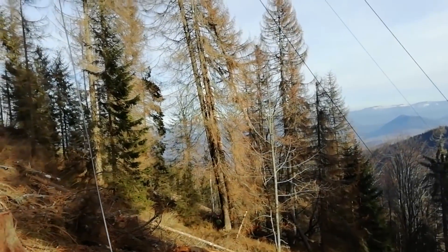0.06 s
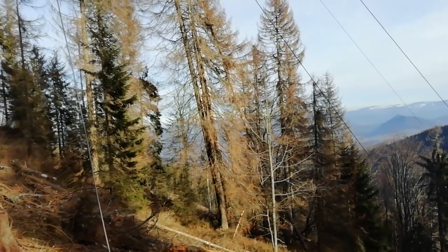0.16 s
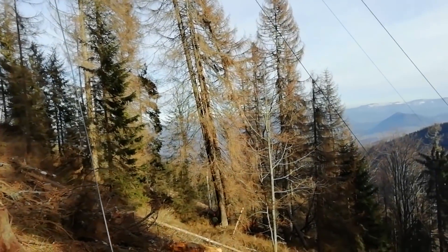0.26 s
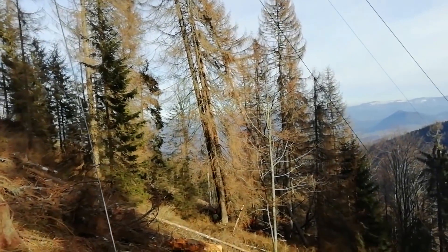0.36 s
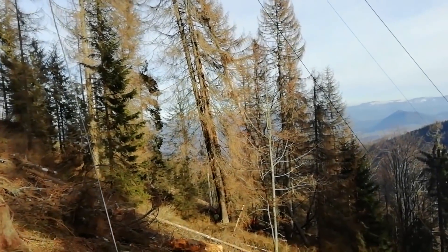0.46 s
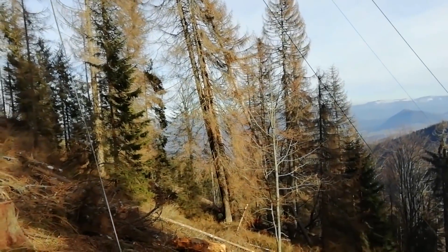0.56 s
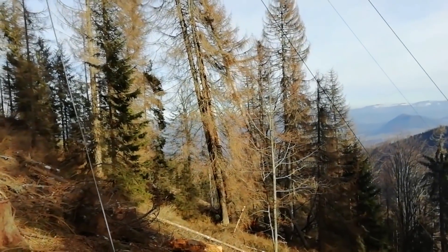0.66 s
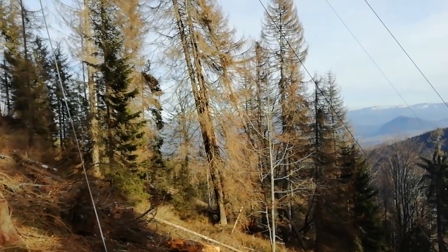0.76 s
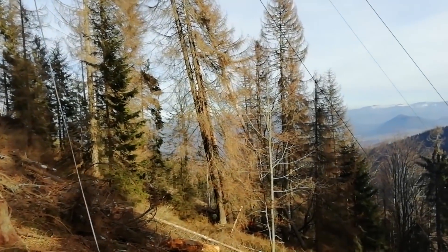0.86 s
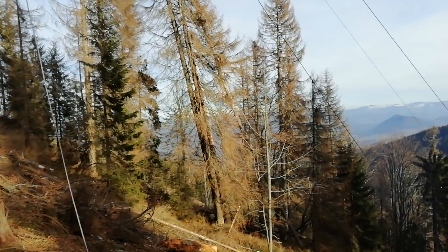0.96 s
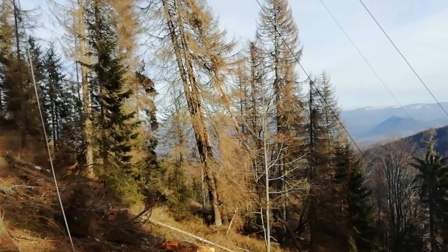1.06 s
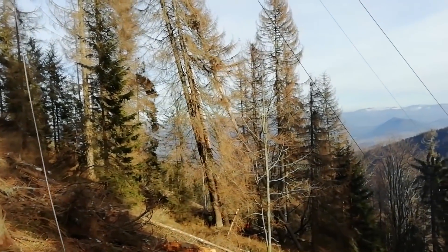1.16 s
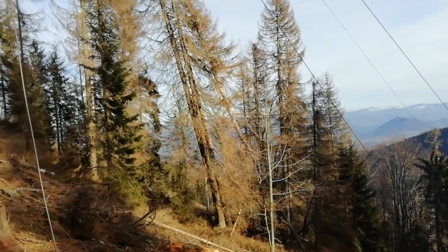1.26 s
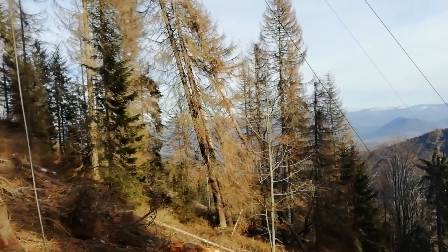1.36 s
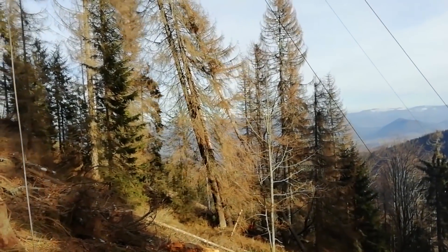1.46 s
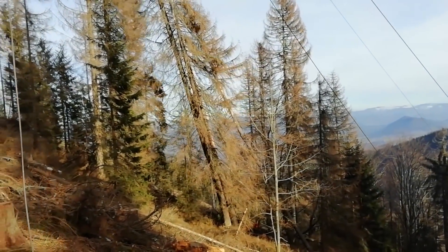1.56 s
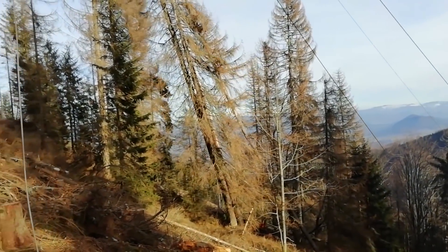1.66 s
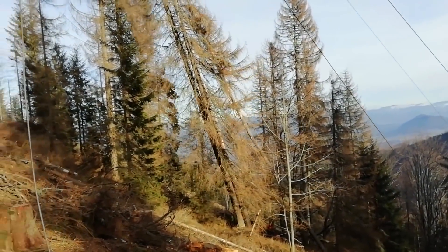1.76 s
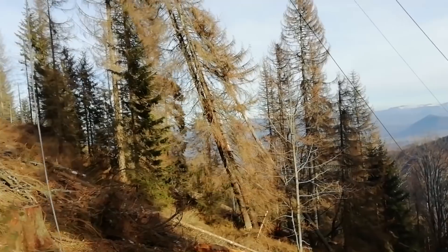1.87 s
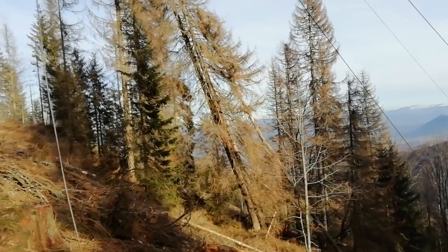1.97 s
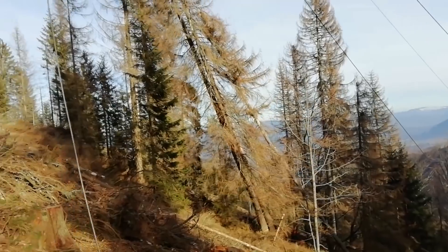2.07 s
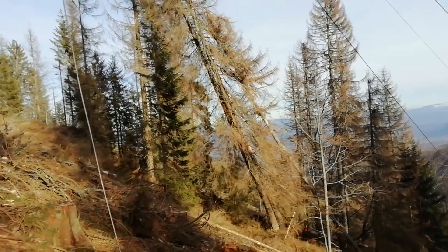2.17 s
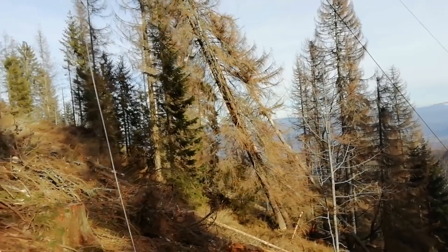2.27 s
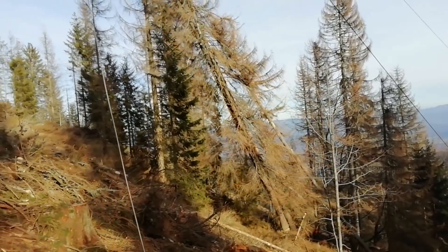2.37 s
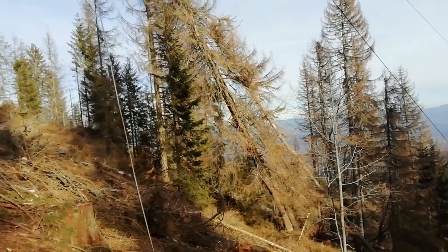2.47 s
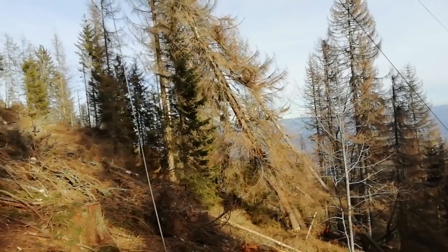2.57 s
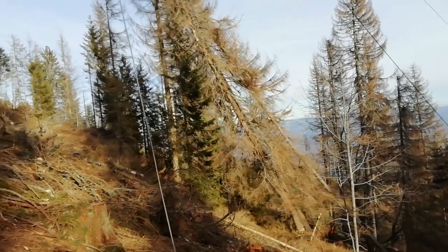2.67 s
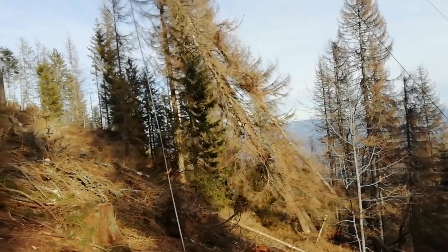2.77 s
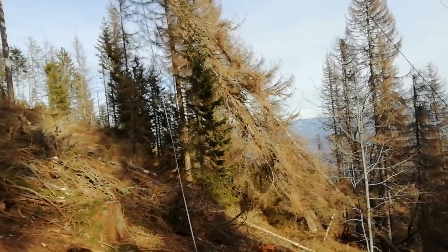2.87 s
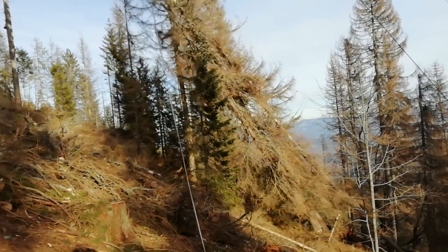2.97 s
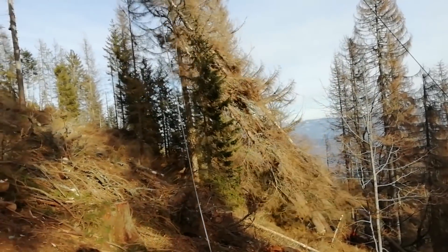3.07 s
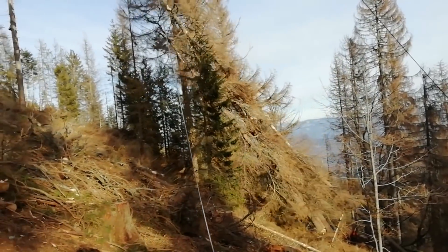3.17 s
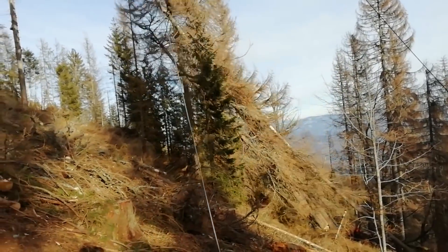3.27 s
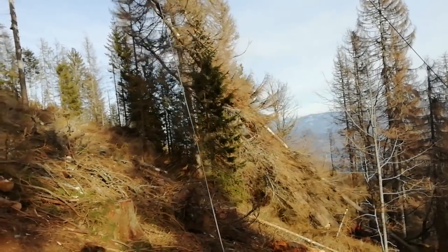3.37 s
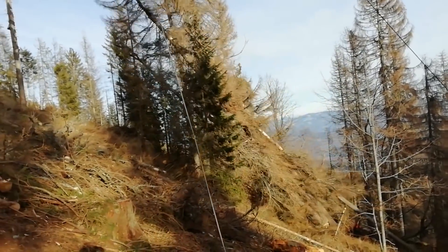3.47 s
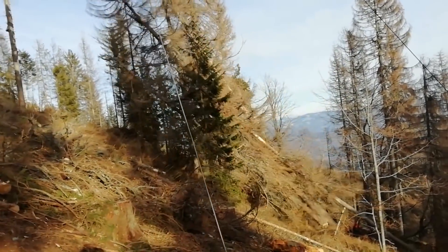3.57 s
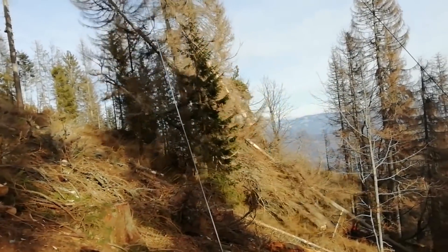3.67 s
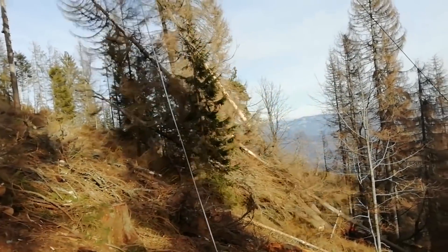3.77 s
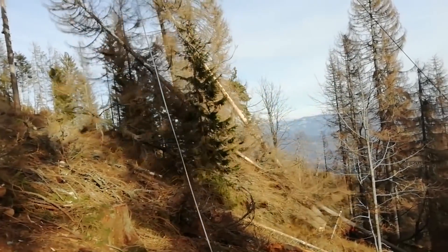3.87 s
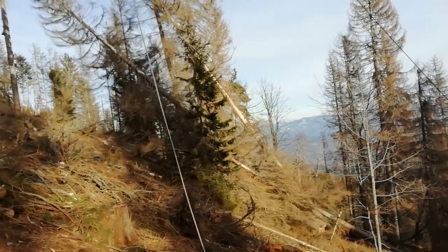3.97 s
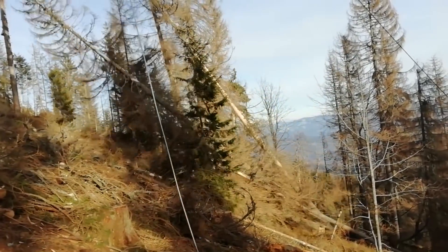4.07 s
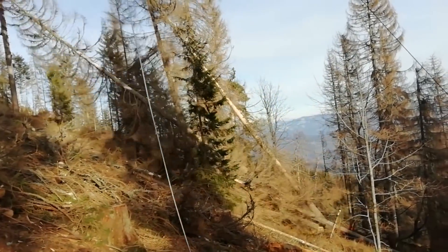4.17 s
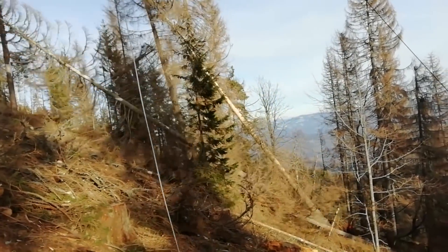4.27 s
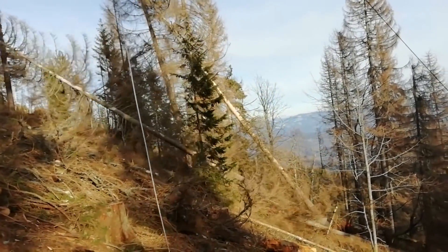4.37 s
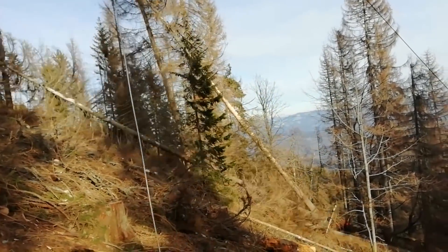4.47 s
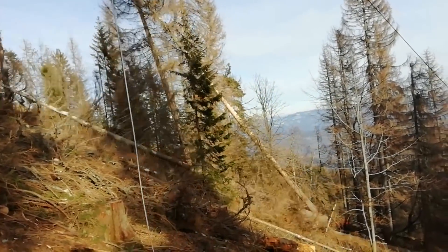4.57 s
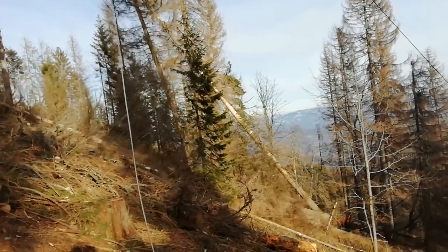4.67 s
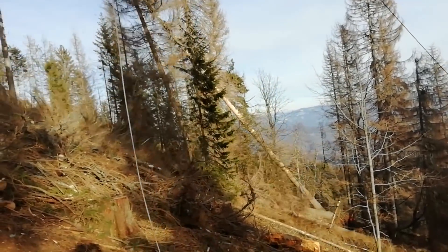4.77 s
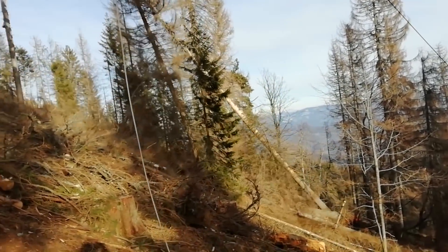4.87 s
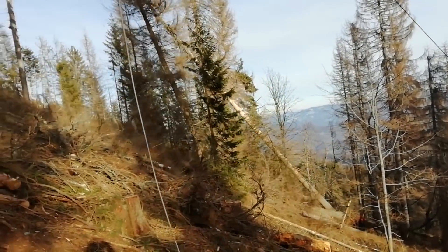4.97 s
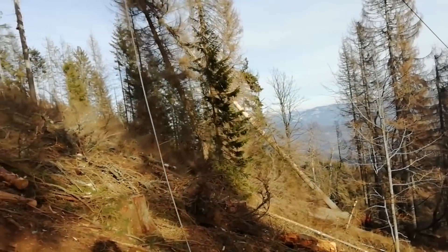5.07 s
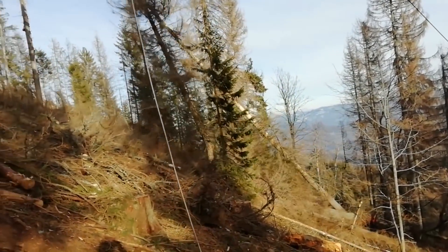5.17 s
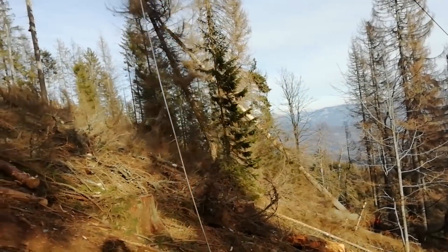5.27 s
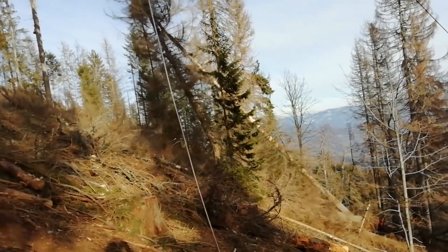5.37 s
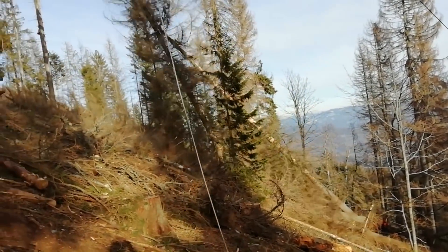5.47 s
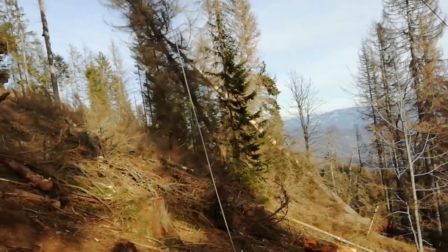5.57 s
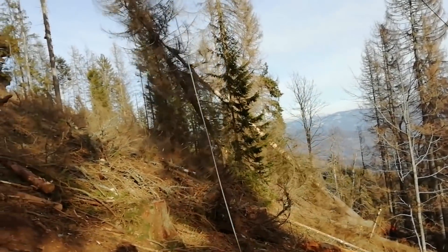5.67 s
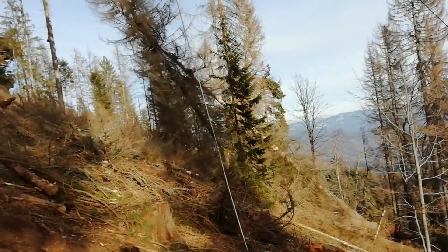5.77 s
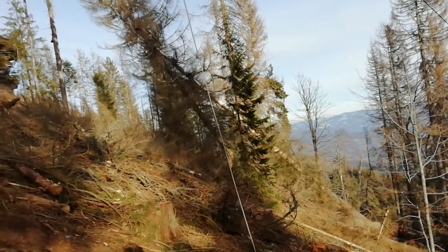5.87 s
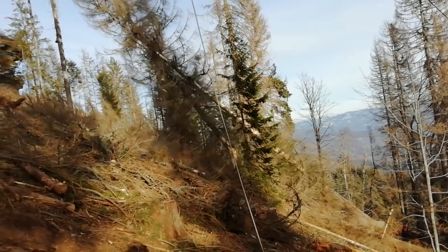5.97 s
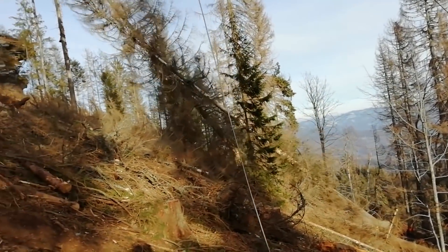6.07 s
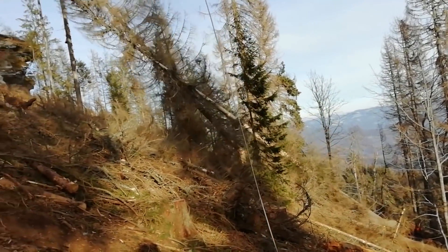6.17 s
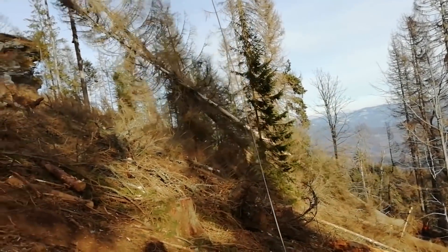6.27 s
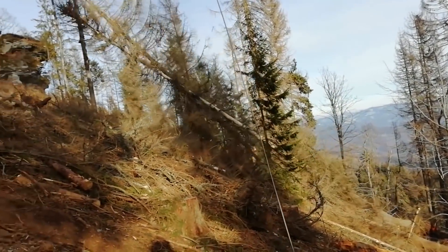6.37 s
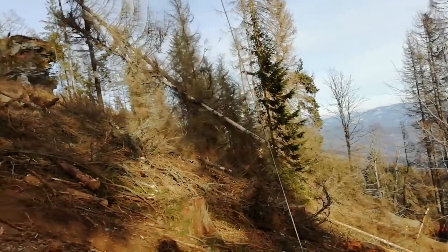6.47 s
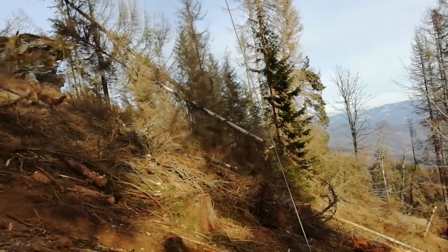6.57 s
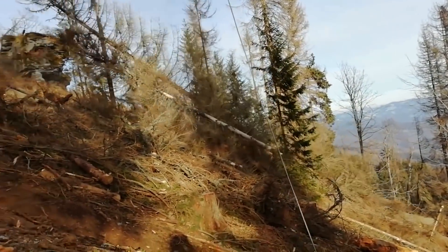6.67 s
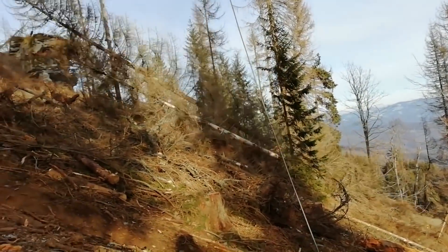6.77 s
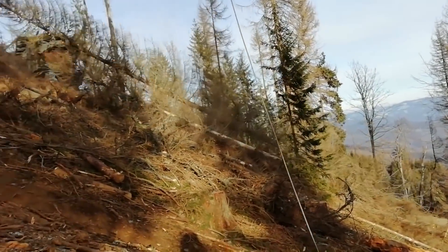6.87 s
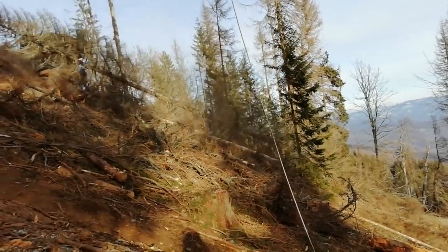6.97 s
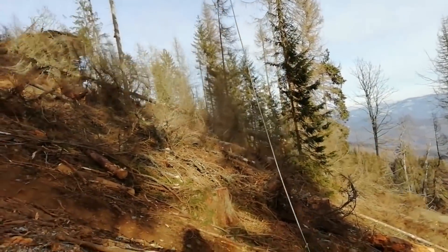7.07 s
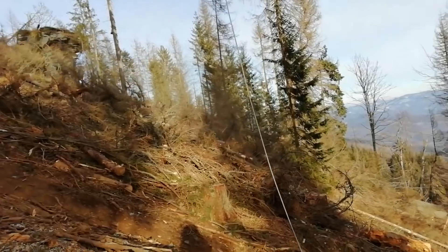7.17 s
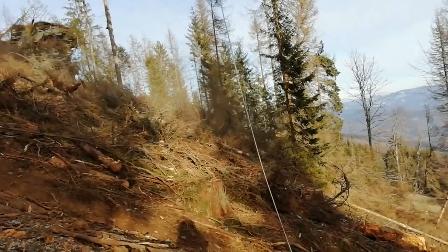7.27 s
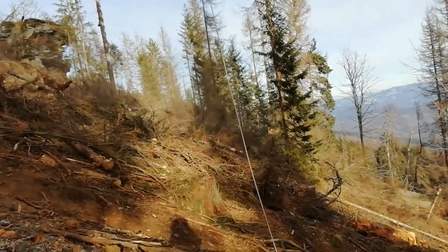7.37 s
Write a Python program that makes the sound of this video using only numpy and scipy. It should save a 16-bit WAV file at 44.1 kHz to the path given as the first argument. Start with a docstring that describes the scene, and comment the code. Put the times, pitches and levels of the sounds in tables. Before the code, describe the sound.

On a wooded slope, heard from some distance on a hand-held stereo microphone, a tree tears loose with a few hard cracks, quiets to sparse ticking twigs, then crashes through branches in dense snapping and crunching. Needles swish and low thuds rumble beneath. Scattered cracks follow as a second tree falls, with one dull jolt at the microphone and a final thick crackling burst.

```python
"""On a wooded slope, some way from a hand-held camera, felled trees tear loose and crash through their neighbours.
Limbs crack one by one as shaped noise bursts with a wood resonance; random pulses make the crackle of twigs
and steady noise the swish of needles. Decaying sparse echoes off the trunks give each crack a short tail.
Filtered noise and single low pulses rumble as light wind and ground thuds; one pressure step jolts the microphones."""
import sys
import numpy as np
from scipy import signal
from scipy.fft import rfft, irfft, next_fast_len
from scipy.io import wavfile
from scipy.ndimage import uniform_filter1d

SR = 44100
rng = np.random.default_rng(int(sys.argv[2]) if len(sys.argv) > 2 else 0)


def unload_audio(sound):
    """Save the sound as a 16-bit wav file, at the path given as the first command line argument."""
    columns = np.transpose(np.atleast_2d(sound))
    # keep every value between -1 and 1, then stretch to whole-number steps
    steps = np.round(np.clip(columns, -1, 1) * 32767)
    wavfile.write(sys.argv[1], SR, steps.astype(np.int16))


N = 327222

# limbs that break: peak t/s, body peak level/dB, wood pitch f/Hz, snap level/dB re body, brightness/dB,
# t60/s (before the factor of each register)
LIMBS = [(0.063, -19.5, 1980, 0.5, -5.5, 0.039), (0.088, -16, 2090, -1, -13.5, 0.079),
         (0.101, -18.5, 1120, 0.5, -20, 0.034), (0.1271, -17.5, 2040, 5, -5.5, 0.046),
         (0.221, -12, 1280, -6.5, -14, 0.021), (0.332, -16.5, 794, -0.5, -14, 0.029),
         (0.358, -19, 1540, 1, -16, 0.027), (0.384, -8, 1490, -9, -19, 0.025),
         (0.699, -18, 1000, -15, -40, 0.03), (0.806, -11, 1430, -5.5, -11.5, 0.023),
         (0.846, -29, 1880, -2, -3, 0.077), (0.897, -30, 1810, -1, -6.5, 0.17),
         (1.017, -34, 1140, 2, -3, 0.033), (1.027, -26.5, 1140, -0.5, -6, 0.21),
         (1.367, -22, 1480, -3.5, -6.5, 0.035), (1.454, -36.5, 1510, 4, 4, 0.22),
         (1.546, -24, 1380, 4, -4.5, 0.034), (1.602, -13, 2100, 1, -15, 0.022),
         (1.62, -37.5, 1510, -15, 11, 0.016), (1.678, -25, 1140, 0.5, -9.5, 0.2),
         (1.885, -44.5, 1490, 8, 8, 0.01), (1.92, -32, 1290, 4.5, -1.5, 0.04),
         (1.981, -33, 1550, 7, -6, 0.023), (2.045, -32.5, 1190, 4, -18, 0.061),
         (2.174, -31, 1810, 7, 4.5, 0.018), (2.264, -40, 1170, -11, 8.5, 0.039),
         (2.331, -40, 1370, 4, 11.5, 0.029), (2.404, -33, 1290, 11, 2.5, 0.052),
         (2.476, -27.5, 1510, 0, 0, 0.52), (2.57, -26, 1570, 2, 2.5, 0.01),
         (2.736, -14.5, 1510, 2.5, -7, 0.041), (2.894, -44, 1490, -15, 10, 0.085),
         (2.918, -18, 840, 2.5, -2, 0.032), (2.97, -10.5, 1390, -10, -8.5, 0.043),
         (3.007, -17, 1360, 1, -9, 0.13), (3.086, -17.5, 921, 8.5, -5, 0.016),
         (3.098, -12, 1230, -17, -11, 0.065), (3.216, -7.5, 1090, -43, -22, 0.012),
         (3.239, -18.5, 1340, 3, -6.5, 0.046), (3.253, -11, 1270, -3.5, -6, 0.042),
         (3.303, -9.5, 1510, -3.5, -10, 0.037), (3.311, -16.5, 1330, 0, -3, 0.11),
         (3.35, -10.5, 1070, -2, -7, 0.02), (3.372, -8.5, 1880, -6, -13, 0.011),
         (3.381, -13, 1350, 1, -10, 0.017), (3.467, -13, 1600, -12, -7, 0.035),
         (3.516, -10.5, 1050, -6, -9.5, 0.034), (3.555, -14.5, 1920, 1, -7.5, 0.03),
         (3.577, -14, 1220, 4.5, -6.5, 0.056), (3.625, -12.5, 2070, -0.5, -8, 0.056),
         (3.669, -16, 1920, 1, -5.5, 0.058), (3.703, -21, 1020, 1, -5, 0.037),
         (3.751, -8.5, 1385, 1, -19, 0.045), (3.827, -20.5, 1280, -13, -5, 0.026),
         (3.969, -11.5, 1120, -9, -14, 0.028), (4.029, -13.5, 1390, -15, -6.5, 0.015),
         (4.066, -16.5, 1160, -18, -5.5, 0.029), (4.121, -16.5, 1200, -9, -9, 0.065),
         (4.149, -14, 1280, 3.5, -12, 0.073), (4.197, -14.5, 1330, -13, -22, 0.026),
         (4.313, -10.5, 1010, 6, -5, 0.014), (4.329, -7, 1050, -19, -26, 0.031),
         (4.369, -18, 1130, 10, -9, 0.02), (4.431, -11, 930, 7, -9, 0.026),
         (4.505, -16.5, 1000, 4, -9, 0.083), (4.581, -9.5, 1700, -6, -11, 0.064),
         (4.606, -21.5, 1740, -1, -4, 0.085), (4.635, -11.5, 1330, -3, -11, 0.025),
         (4.682, -28, 1250, 13, -17, 0.054), (4.696, -14, 1310, -2, -17, 0.02),
         (4.773, -20.5, 1900, 5, -7.5, 0.037), (4.782, -16.5, 1290, 4, -7.5, 0.052),
         (4.809, -22, 1300, 5, -4.5, 0.017), (4.84, -22, 1310, -3, -13, 0.03),
         (4.868, -14, 1140, -6, -22, 0.086), (4.992, -15.5, 980, -17, -22, 0.036),
         (5.122, -13, 1164, -9, -11.5, 0.067), (5.211, -13, 1220, -4, -12, 0.034),
         (5.306, -14, 1930, 0, -10, 0.059), (5.343, -12.5, 1430, -3.5, -10, 0.043),
         (5.512, -16, 1380, -1.5, -6, 0.035), (5.547, -23.5, 1190, -5, -7, 0.029),
         (5.618, -16.5, 1750, 0, -7, 0.025), (5.779, -18.5, 1830, -3, -7.5, 0.011),
         (5.918, -22, 2020, 1, -2.5, 0.029), (5.954, -28, 1780, -10, -3.5, 0.2),
         (6.096, -34, 1100, 6, 4, 0.015), (6.12, -13.5, 1440, 1, -8.5, 0.02),
         (6.221, -16, 990, -4.5, -27, 0.032), (6.234, -18, 1440, -7, -4.5, 0.029),
         (6.282, -18.5, 1390, -14, -18, 0.089), (6.408, -30, 1820, -2, -6, 0.11),
         (6.556, -16, 1420, -6, -10, 0.053), (6.592, -34, 1160, 12, 3, 0.0098),
         (6.834, -12.5, 1640, -1, -8, 0.048), (6.883, -17.5, 1630, 4.5, -3.5, 0.073),
         (6.896, -13, 1830, 4, -7, 0.023), (7.055, -14.5, 1290, -5, -5, 0.017),
         (7.127, -15, 1490, 5, -9, 0.037), (7.142, -18, 1900, 4, -6, 0.023),
         (7.205, -22, 1260, -12, -9, 0.014), (7.226, -11, 1250, -14, -18, 0.021),
         (7.266, -10, 1960, 2, -2.5, 0.061), (7.286, -13.5, 1500, -4, -17, 0.027),
         (7.398, -8, 1930, 0, -26, 0.011)]
# splinters, then tick, of a limb: level/dB re body, slope/(dB per dB of brightness)
UPPER_REGISTERS = [(5.5, 1.5), (-3.5, 1.3)]
# wood under strain, brittle to stringy: t/s, share of the t60 taken by the last 10 dB of the rise
# (before the factor of each register; values at or below 0 rise at once)
STRAIN = [(0, -0.02), (2.8, 0.26), (3.25, 0), (3.95, 0.4), (5, -0.04), (5.45, 0.15), (6.95, 0.02), (7.2, 0)]
# outer registers of the breaking wood: t/s, top treble level/dB, thump level/dB (added to the base levels)
OUTER_REGISTERS = [(0, -1, -4), (1.9, 0.5, 4), (2.3, 4, 3), (2.9, -1, 7), (3.25, -7.5, 6), (3.75, -1, 7.5),
                   (4.2, 2, 5), (5, -1.5, 2.5), (5.6, 0.5, 4.5), (6.7, 4, 5), (7.2, -2.5, -3)]
# breaking wood through the microphones: f/Hz, spectrum level/(dB per Hz)
WOOD_COLOUR = [(120, -18.5), (200, -7.5), (283, -7.5), (360, -11.5), (647, -3), (1230, 3.5), (3250, 0),
               (4040, -9), (5200, -5.5), (6300, -14), (7540, -32), (9750, -31.5), (11900, -35),
               (14900, -31.5), (16000, -53)]
# borders between thump, wood, snap, splinters and hiss: f/Hz
REGISTER_BORDERS = [520, 2000, 3800, 7500]
# where the breaking wood stands: t/s, lead of the left port/ms, left-right level/dB
WOOD_BEARING = [(0, 0.074, 1), (3, 0.092, -0.5), (5.3, 0.19, -1.5), (5.5, -0.029, 1), (6.7, -.05, 0),
                (6.9, 0.076, 1.5), (7.42, 0.16, -2.5)]
# smaller twigs heard singly: t/s, peak level/dB (before the common level), pitch f/Hz
SINGLE_TWIGS = [(.089, -19, 5400), (0.333, -17.5, 4800), (.568, -28, 716), (0.604, -20, 5660),
                (1.145, -18.5, 1370), (1.286, -24, 1390), (1.524, -15.5, 1690), (1.918, -9, 4780),
                (2.173, -16, 13600), (2.336, -5.5, 4840), (2.4738, -13.5, 4890), (3.0734, -16, 13600),
                (3.0835, -15, 9980), (3.267, -14, 1160), (3.292, -18, 1200), (3.32, -15, 4700),
                (3.8232, -10, 10200), (3.872, -9.5, 1400), (3.962, -11, 1230), (3.9659, -16, 4200),
                (4.0888, -12, 5400), (4.147, -10, 5200), (4.304, -11, 5000), (4.361, -8, 1920),
                (4.3685, -8, 12600), (4.45, -7.5, 1100), (4.6299, -14, 5800), (4.6705, -15, 5000),
                (4.804, -8, 1290), (4.887, -14, 1450), (4.95, -13.5, 1070), (5.2095, -8.5, 4530),
                (5.246, -16, 2360), (5.255, -14, 4800), (5.3418, -9, 4900), (5.511, -10.5, 3020),
                (5.537, -14, 13200), (5.6158, -16, 9900), (5.771, -15, 2260), (5.916, -13.5, 9610),
                (5.916, -6.5, 2960), (6.119, -12, 3060), (6.15, -15, 1300), (6.35, -25, 4200),
                (6.431, -19, 2430), (6.5037, -14.5, 6560), (6.821, -9, 1620), (7.0674, -15, 9200),
                (7.067, -14, 5230), (7.2085, -13, 5030), (7.237, -13, 5000), (7.311, -8.5, 3240),
                (7.3776, -12, 5000)]
# branches sweeping through branches: t/s, crackle level/dB, treble level/dB re crackle
BRANCH_SWEEP = [(0, -56, -8), (.07, -45, -12), (.3, -47, -9), (.6, -49, -3.5), (.75, -47, -10),
                (.9, -43, -5.5), (1.3, -48.5, -3.5), (1.6, -44, -3), (1.9, -48, -3), (2.45, -42.5, 3.5),
                (2.65, -44.5, 0.5), (3.15, -35.5, 1), (3.8, -33.5, -3.5), (4.05, -26.5, -10),
                (4.3, -27, -6), (4.87, -26.5, -10.5), (5.05, -35.5, -6), (5.55, -44, -3.5), (6.65, -43, 0),
                (7.2, -24.5, -3.5), (7.42, -31, -6)]
# scatter off the trunks: f/Hz, t60/s
TRUNK_DECAY = [(300, 0.76), (800, 0.057), (2100, 0.28), (5500, 0.38), (14000, 0.01)]
# single low bumps at the microphones: t/s, level/dB (before the pulse envelope), f/Hz
LOW_BUMPS = [(0.201, -29.5, 100), (0.305, -31, 101), (0.927, -36, 56.5), (1.02, -35, 82), (1.086, -28, 97),
             (1.782, -35, 64.5), (2.229, -35.5, 65), (2.451, -37, 71), (3.55, -31, 86.1),
             (3.778, -33.5, 33), (4.271, -25, 90), (4.958, -36, 53), (6.18, -34, 60), (7.037, -32.5, 64.6)]
# low rumble: t/s, level/dB
RUMBLE_LEVEL = [(0, -45.5), (.3, -46.5), (1.0, -49.5), (1.4, -58.5), (1.8, -54.5), (2.8, -57), (3.2, -51),
                (3.8, -47), (4.3, -40.5), (4.97, -43), (5.15, -57), (6.65, -60), (7, -50.5), (7.42, -48)]
# low rumble: f/Hz, spectrum level/(dB per Hz)
RUMBLE_COLOUR = [(8.8, -27), (15, -1.5), (86, 5), (144, -1.5), (282, -7), (357, -16), (500, -52),
                 (1100, -120)]
# unequal colour of the two ports: f/Hz, left-right level/dB
PORT_COLOUR = [(200, 0), (450, 1.5), (800, 3), (1200, .5), (1800, -6), (2200, -5), (2800, 2.5), (3500, .5),
               (5200, -6), (7500, -1.5), (9500, .5), (12000, 7), (15000, 9)]
# level change of the left-right difference: f/Hz, level/dB
SIDE_LEVEL = [(30, -6), (80, -18), (250, -4), (600, 6), (1200, 1), (2000, 0)]

RING = .45  # share of a limb's body that rings at its pitch
JERK = 8  # size of the parting jerk, re the grit before shaping
SLIP, SLIPS_PER_S = 6, 300  # size and rate of strands giving way singly
HISS_DB = -4  # needle hiss re splinters
LIMB_ECHO_DB, CROWN_ECHO_DB = -11, -13  # scatter re direct sound
KNOCK_S, KNOCK_DB = 6.2343, -9.5
JOLT_DB, RECOVERY_DB_PER_S = -24, 260  # threshold and recovery of the gain control
EDGE_HZ, CEILING = 16150, .9  # band limit, amplitude of the soft ceiling


def cracks(spiky=1.42, sharpness=7, thump_db=-27, stringy=0.069, crisp=(1.05, .85, .7, .55)):
    """Brittle fracture: fibres tear, the limb parts in a jerk and excites a damped resonance; treble dies sooner."""
    before = 800  # samples ahead of the peak
    t = (np.arange(4000) - before) / SR
    fade_in = np.clip(1 + t * SR / before, 0, 1)
    lead_ms, pan_db = curve(WOOD_BEARING)
    tear, = curve(STRAIN)
    top_db, low_db = curve(OUTER_REGISTERS)
    peaks = [round(row[0] * SR) for row in LIMBS]
    brittle = np.exp(-tear[peaks] / stringy)  # stringy wood parts with a weaker jerk

    grit = rng.standard_normal((len(LIMBS), len(t)))
    grit = np.sign(grit) * abs(grit) ** spiky  # a few fibres dominate
    grit += SLIP * np.sign(grit) * (rng.random(grit.shape) < SLIPS_PER_S / SR)
    grit[:, before - 2] *= 1 + JERK * brittle / abs(grit[:, before - 2])  # the jerk
    thump, wood, *upper = registers(coloured(grit, WOOD_COLOUR)[:, :len(t)])

    out = np.zeros((2, N + before))
    aside_ms = rng.normal(0, .05, len(LIMBS))  # each limb stands a little apart
    for row, (_, db, hz, snap_db, bright_db, t60) in enumerate(LIMBS):
        at = peaks[row]
        r = np.exp(-np.pi * hz / sharpness / SR)
        rung = signal.lfilter([1], [1, -2 * r * np.cos(2 * np.pi * hz / SR), r * r], wood[row])
        body = RING * evened(rung) + (1 - RING) * evened(wood[row])
        body += gain_of(thump_db + low_db[at]) * evened(thump[row])

        tearing_db = 10 * np.minimum(t, 0) / max(tear[at] * t60, 1e-4)
        dying_db = -60 * np.maximum(t, 0) / t60
        parts = [body] + [p[row] for p in upper]
        rel_db = [0, snap_db] + [base_db + slope * bright_db for base_db, slope in UPPER_REGISTERS]
        rel_db[-1] += top_db[at]
        sound = np.zeros(len(t))
        for part, part_db, length in zip(parts, rel_db, crisp):
            shaped = part * fade_in * gain_of((tearing_db + dying_db) / length)
            sound += gain_of(db + part_db) * peaked(shaped)

        lag = round((lead_ms[at] + aside_ms[row]) * SR / 1000)
        add(out[0], at, sound * gain_of(pan_db[at] / 2))
        add(out[1], at + lag, sound * gain_of(-pan_db[at] / 2))
    return out[:, before:]


def near_ticks(t60=.011, spread=1.135, level_db=-5.5):
    """Damped narrow-band burst: each twig sounds around its own pitch, and lower pitches last longer."""
    t, out = np.arange(1500) / SR, np.zeros(N)
    grains = rng.standard_normal((len(SINGLE_TWIGS), len(t)))
    for (s, db, hz), grain in zip(SINGLE_TWIGS, grains):
        dying = grain * gain_of(-60 * t / t60 * np.sqrt(hz / 5000))  # t60 holds at 5 kHz
        band = signal.butter(2, [hz / spread, hz * spread], "band", fs=SR)
        tick = signal.lfilter(*band, dying)
        add(out, round(s * SR), gain_of(db + level_db) * tick / abs(tick).max())
    return out


def ticks(per_s=160, size_db=5, fall_db=3.0, cycles=25, low_hz=800, high_hz=13500):
    """Random pulse process: dry twigs tick in 16 pitch classes, each dying over a set number of cycles."""
    body_db, treble_db = curve(BRANCH_SWEEP)
    out = np.zeros((2, N))
    for hz in np.geomspace(low_hz, high_hz, num=16):
        sizes = gain_of(size_db * np.minimum(rng.exponential(1, N), 2.5))
        snaps = sizes * (rng.random(N) < per_s / 16 / SR)
        dying = signal.lfilter([1], [1, -gain_of(-60 * hz / cycles / SR)], snaps) * rng.standard_normal(N)
        ringing = signal.lfilter(*signal.butter(1, [hz / 1.15, hz * 1.15], "band", fs=SR), dying)
        side_db = rng.uniform(-4, 4)
        class_db = np.array([[side_db], [-side_db]]) - fall_db * np.log2(hz / low_hz)
        out += ringing * np.sqrt(SR / hz) * gain_of(class_db)
    return out * gain_of(body_db + .5 * treble_db)


def sweep(twigs_per_s=900, size_db=2.5, largest=5.9, thump_db=-17, hiss=(.6, .32, .32, .45, .55),
          bearing_ms=0.065, together=0.42):
    """Extended source: twigs snap in clumps all over the crown, over the noise-like swish of needles."""
    body_db, treble_db = curve(BRANCH_SWEEP)
    lead_ms, pan_db = curve(WOOD_BEARING)
    top_db, low_db = curve(OUTER_REGISTERS)
    caught = crunches()
    twigs, swish = np.zeros((2, N)), np.zeros((2, N))
    for bearing in np.linspace(-1.5, 1.5, num=10):  # parts of the crown, side by side
        sizes = gain_of(size_db * np.minimum(rng.exponential(1, N), largest))
        snaps = sizes * (rng.random(N) < twigs_per_s / 10 / SR)
        # each snap dies by 60 dB in 11 ms
        grains = signal.lfilter([1], [1, -gain_of(-60 / 0.011 / SR)], snaps) * rng.standard_normal(N)
        lag = np.round((lead_ms + bearing_ms * bearing) * SR / 1000).astype(int)
        delayed = np.clip(np.arange(N) - lag, 0, N - 1)
        for mix, part in (twigs, grains), (swish, rng.standard_normal(N)):
            mix[0] += part
            mix[1] += part[delayed]
    twigs = registers(coloured(twigs, WOOD_COLOUR))
    swish = registers(coloured(swish, WOOD_COLOUR))

    splinter_db = body_db + treble_db
    levels = [body_db + thump_db + low_db, body_db, body_db, splinter_db, splinter_db + HISS_DB + top_db]
    crown = np.zeros((2, N))
    for db, share, dry_part, soft_part in zip(levels, hiss, twigs, swish):
        # thick and thin wood catch partly together, partly on their own
        clumps = caught ** together * crunches() ** (1 - together)
        crackle = evened(dry_part * clumps)
        needles = evened(soft_part * np.sqrt(clumps))
        crown += gain_of(db) * evened((1 - share) * crackle + share * needles)
    return crown * gain_of([pan_db / 2, -pan_db / 2])


def crunches(per_s=60, lasts_s=0.005, between=0.4):
    """Relaxation: boughs catch at random, the crackle jumps up and decays; the slow level stays put."""
    caught = rng.exponential(1, N) * (rng.random(N) < per_s / SR)
    decaying = signal.lfilter([1], [1, -np.exp(-1 / (lasts_s * SR))], caught)
    level = uniform_filter1d(between + np.minimum(decaying, .9), size=24)
    return level / np.sqrt(uniform_filter1d(level ** 2, size=SR // 6))


def scatter(x):
    """Averaged multipath: three random echo tails crossfade in regular turn, so no fixed colouring stands out."""
    turn = np.arange(N) / SR * 2 * np.pi * 2
    # the squares of the three weights always add up to 1
    return sum(trunks(x * np.sqrt(2 / 3) * np.cos(turn + k * np.pi / 3)) for k in range(3))


def trunks(x):
    """Multiple scattering: sparse echoes of random sign, with a decay rate that depends on frequency."""
    taps = np.zeros((2, SR // 2))
    at = np.arange(60, SR // 2 - 20, 20) + rng.integers(0, 20, (2, (SR // 2 - 61) // 20))
    np.put_along_axis(taps, at, rng.choice([-1., 1.], at.shape), 1)
    hz, t, z = signal.stft(taps, SR, nperseg=128)
    decay = gain_of(-60 * t / read(TRUNK_DECAY, hz)[:, None])
    tail = signal.istft(z * decay, SR, nperseg=128)[1]
    tail += 0.043 * tail[::-1]  # each port hears a little of the other's echoes
    return signal.oaconvolve(x, tail / np.linalg.norm(tail[0]), axes=1)[:, :N]


def knock():
    """Step response: a pressure jolt on the housing leaks away and swings back, with a short ring."""
    t, out = np.arange(SR // 2) / SR, np.zeros(N)
    ring = 1 + .4 * np.cos(2 * np.pi * 1500 * t)
    step = -np.exp(-t / .003) * ring + .045 * np.exp(-t / .12)
    add(out, round(KNOCK_S * SR), gain_of(KNOCK_DB) * step)
    return out


def bumps(cycles=0.4):
    """Pulse excitation: each bump is about one cycle of low pressure under a bell-shaped envelope."""
    out = np.zeros(N)
    for s, db, hz in LOW_BUMPS:
        turns = np.arange(0, 2, hz / SR)
        envelope = np.exp(-((turns - .55) / cycles) ** 2)
        add(out, round(s * SR), gain_of(db) * np.sin(2 * np.pi * turns) * envelope)
    return out


def rumble():
    """Partly coherent noise: lumpy low pressure from wind and thuds, nearly alike at both ports."""
    common, apart = rng.standard_normal(N), rng.standard_normal((2, N))
    lumps = (common + 0.6 * apart) * gain_of(3.1 * wander(9.3))
    return gain_of(curve(RUMBLE_LEVEL)[0]) * evened(coloured(lumps, RUMBLE_COLOUR))


def wander(per_s):
    """Smoothed noise: a slow random curve of rms 1."""
    width = round(SR / per_s)
    smooth = uniform_filter1d(rng.standard_normal(N), width)
    return evened(uniform_filter1d(smooth, width))


def registers(x):
    """Complementary filters: thump, wood, snap, splinters and hiss, which add up to the whole again."""
    size = next_fast_len(x.shape[-1])
    octaves = np.log2(np.fft.rfftfreq(size, 1 / SR) + 1)
    above = [1] + [(1 + np.tanh(6 * (octaves - np.log2(hz)))) / 2 for hz in REGISTER_BORDERS] + [0]
    whole = rfft(x, size)
    return [irfft(whole * (low - high), size)[..., :x.shape[-1]] for low, high in zip(above, above[1:])]


def coloured(x, points, scale=1):
    """Minimum-phase filter: the phase follows from the log gain, here given as a dB spectrum."""
    hz = abs(np.fft.fftfreq(4096, 1 / SR))
    log_gain = np.log(gain_of(np.maximum(scale * read(points, hz), -100)))
    taps = np.fft.ifft(np.exp(log_gain - 1j * signal.hilbert(log_gain).imag)).real[:2048]
    return signal.oaconvolve(x, taps.reshape((1,) * (x.ndim - 1) + (-1,)), axes=-1)[..., :N]


def read(points, hz):
    """Interpolation of a spectrum on a log-frequency axis."""
    f, value = np.transpose(points)
    return np.interp(np.log(hz + 1), np.log(f + 1), value)


def curve(rows):
    """Linear interpolation: columns of a table as curves over all samples."""
    s, *columns = np.transpose(rows)
    return [np.interp(np.arange(N) / SR, s, c) for c in columns]


def gain_of(db):
    """Level to amplitude: decibels become a factor."""
    return 10 ** (np.asarray(db) / 20)


def evened(x):
    """Power normalisation: scales to rms 1."""
    return x / np.sqrt(np.mean(x ** 2) + 1e-20)


def peaked(x):
    """Peak normalisation: the loudest millisecond has the power of a sine of amplitude 1."""
    return x / np.sqrt(2 * uniform_filter1d(x ** 2, size=44).max())


def add(mix, start, sound):
    """Superposition: mixes a sound in from sample start."""
    part = mix[max(start, 0):][:len(sound)]
    part += sound[:len(part)]


def scene():
    """Superposition of cracks and crackle, their scatter, and what acts on the camera directly."""
    limbs = cracks() + ticks() + near_ticks()
    crown = sweep()
    echoes = scatter(gain_of(LIMB_ECHO_DB) * limbs + gain_of(CROWN_ECHO_DB) * crown)
    return limbs + crown + echoes + rumble() + bumps() + knock()


def steadied(x):
    """Gain control: a jolt of low pressure turns the gain down, and it recovers quickly."""
    low_db = 20 * np.log10(abs(uniform_filter1d(x.mean(0), size=220)) + 1e-9)
    fall = np.arange(N) * RECOVERY_DB_PER_S / SR
    held_db = np.maximum.accumulate(low_db + fall) - fall
    over_db = uniform_filter1d(np.maximum(held_db - JOLT_DB, 0), size=100)
    return x / gain_of(np.r_[np.zeros(300), over_db][:N])  # acts 300 samples late


def record(dry):
    """Receiver chain: port colours, frequency-dependent width, gain control, soft ceiling, band limit."""
    left = coloured(dry[0], PORT_COLOUR, scale=.5)
    right = coloured(dry[1], PORT_COLOUR, scale=-.5)
    side_gain = gain_of(read(SIDE_LEVEL, np.fft.rfftfreq(N, 1 / SR)))
    side = irfft(rfft(left - right) * side_gain, N)
    ports = steadied(np.array([left + right + side, left + right - side]) / 2)
    ports = ports / (1 + (ports / CEILING) ** 4) ** .25
    band_limit = signal.firwin(511, EDGE_HZ, window=("kaiser", 9), fs=SR)
    return signal.oaconvolve(ports, band_limit[None], "same")


dry = scene()
out = record(dry)
unload_audio(out)
```